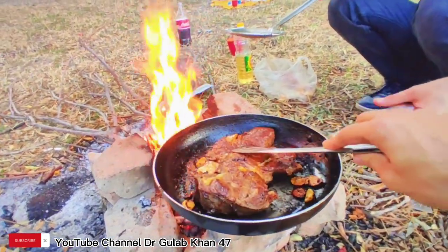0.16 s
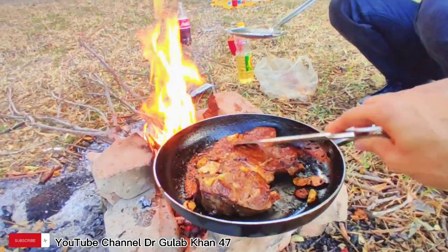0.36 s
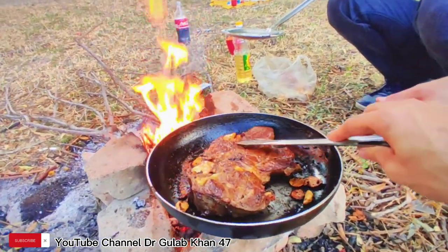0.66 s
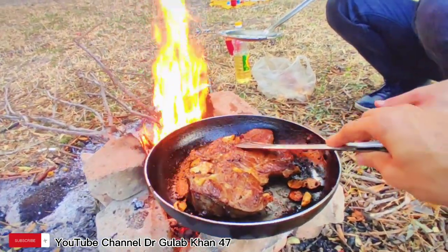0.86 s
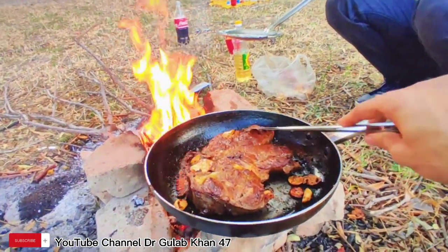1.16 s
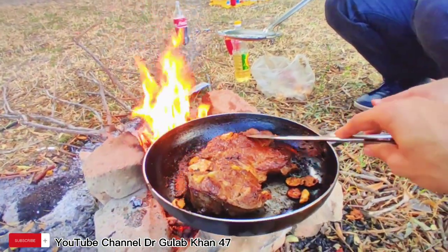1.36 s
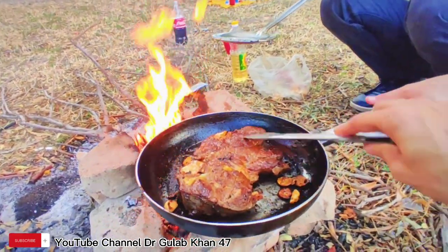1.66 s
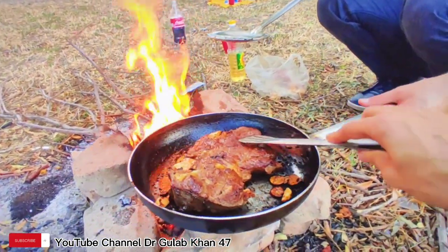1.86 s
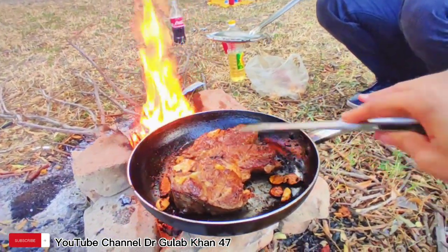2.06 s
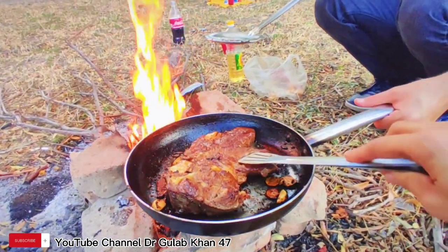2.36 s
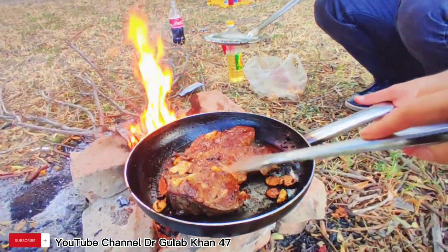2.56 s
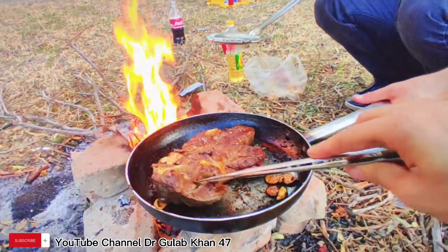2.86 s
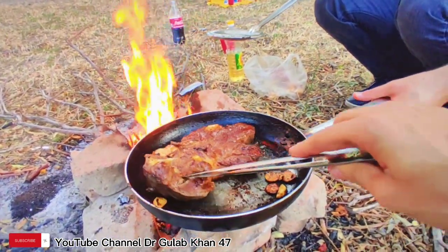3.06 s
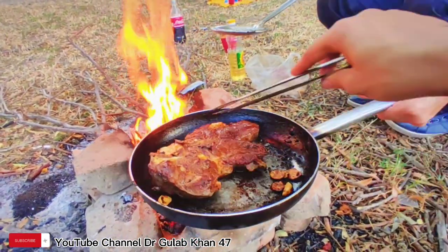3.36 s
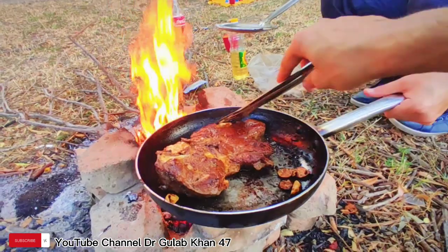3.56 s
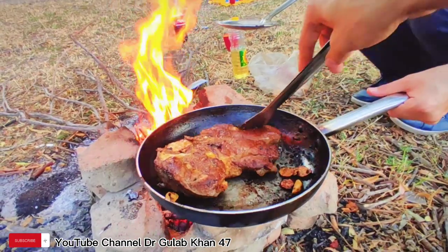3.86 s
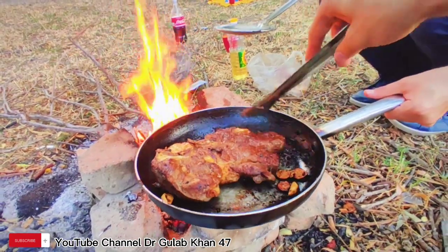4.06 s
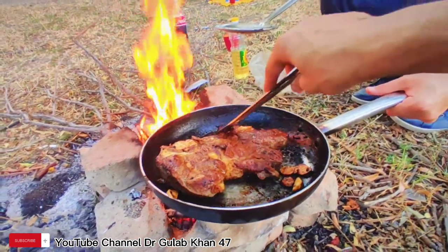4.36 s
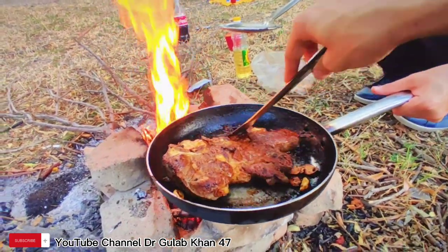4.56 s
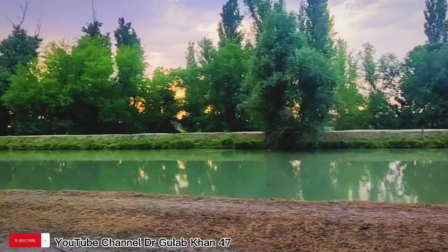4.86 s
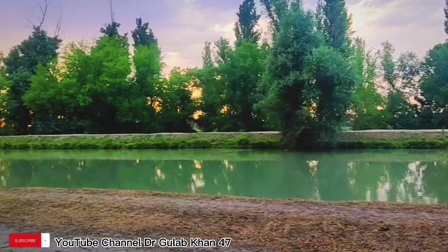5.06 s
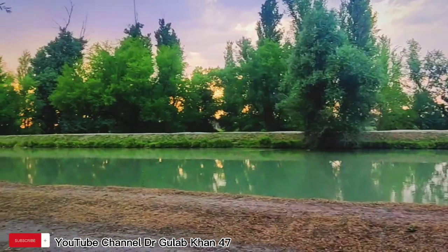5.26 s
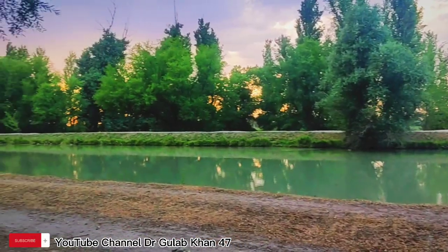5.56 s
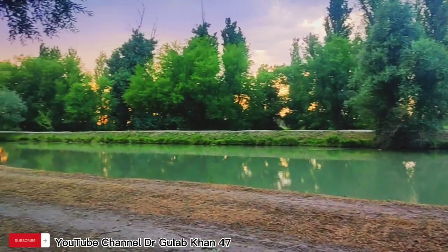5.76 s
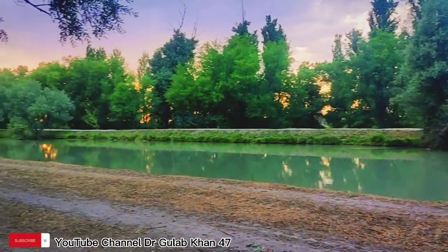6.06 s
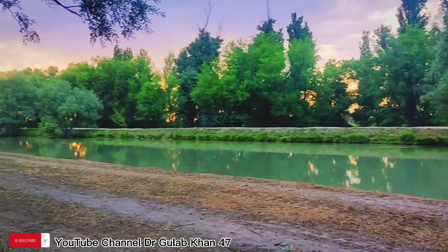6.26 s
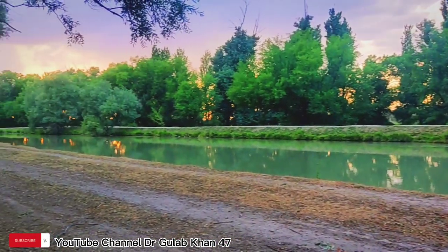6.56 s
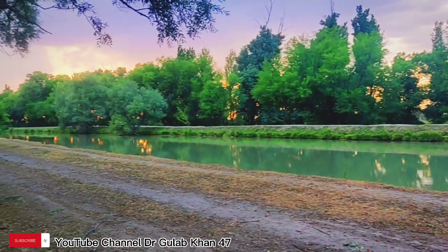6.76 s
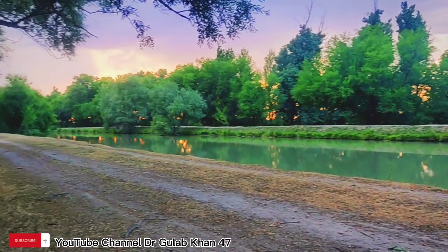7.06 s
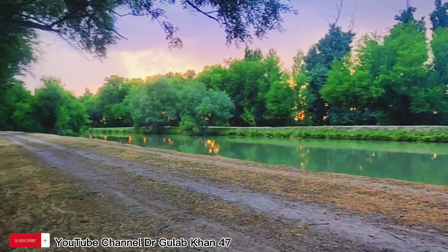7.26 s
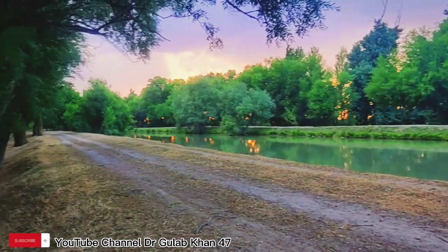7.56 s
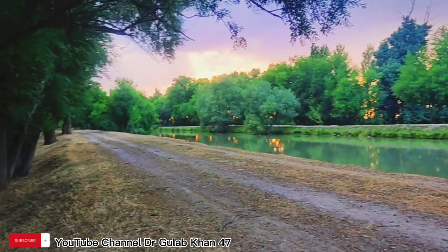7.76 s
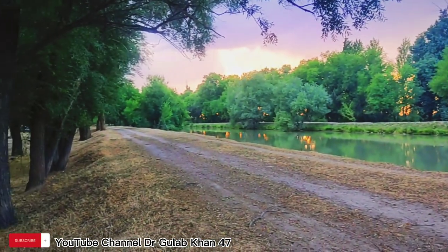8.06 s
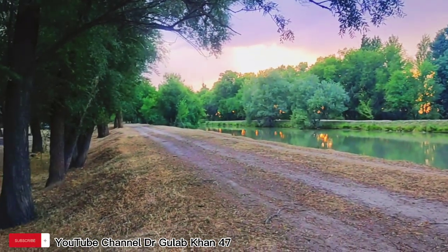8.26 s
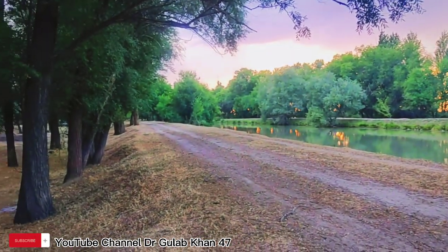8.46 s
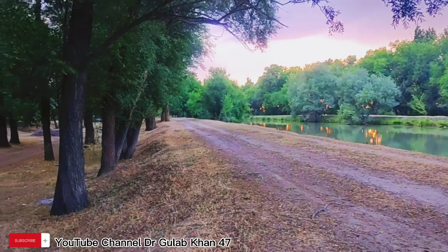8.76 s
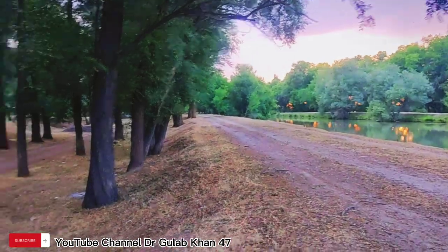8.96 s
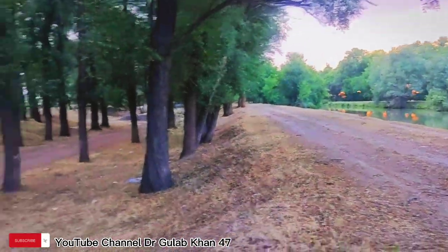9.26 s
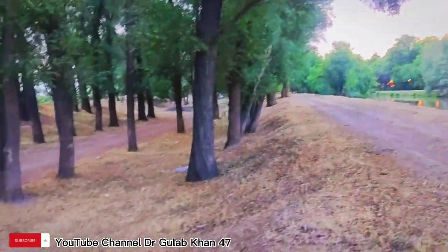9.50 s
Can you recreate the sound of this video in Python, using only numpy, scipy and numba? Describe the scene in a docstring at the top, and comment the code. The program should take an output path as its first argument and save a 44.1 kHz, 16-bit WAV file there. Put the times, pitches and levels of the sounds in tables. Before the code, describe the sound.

Meat fries very close and loud outdoors: dense bright fizz, bubbling juice, wet spits, broad pops and sharp high cracks of fat. Just before five seconds it cuts off instantly to a much quieter tree-lined bank, with faint low rumble and insects. Far birds chirp, then a warbler sings quick high notes with a short woodland tail while a faint dove coos and nearby dry grass rustles and snaps. Stereo phone pickup.

```python
"""Meat frying, then a quiet canal bank

Steam bubbles burst in a pan as short ringing grains; spits, pops and cracks add louder grains and noise bursts.
At 4.838 s the frying stops and a canal bank remains: a warbler, far birds and a dove are gliding tones with
diffuse tails, and dry grass rustles, snaps and knocks nearby as shaped noise and grains.
Filtered noise gives a low rumble and fluttering insect bands under both places."""
import sys
import numpy as np
from scipy import signal
from scipy.fft import rfft, irfft, next_fast_len
from scipy.io import wavfile
from scipy.ndimage import uniform_filter1d
from numba import njit

SR = 44100
rng = np.random.default_rng(int(sys.argv[2]) if len(sys.argv) > 2 else 0)


def dump_mix(stems):
    """Bounce the given channels to the path in sys.argv[1] as a 16-bit WAV at rate SR."""
    frames = np.atleast_2d(stems).T  # one column per channel
    limited = np.clip(frames, -1, 1)  # hard clip at full scale
    pcm = np.round(limited * 32767).astype(np.int16)
    wavfile.write(sys.argv[1], SR, pcm)


N = 424683
FRY_END_S = 4.838

# Colour of the bubbles through pan and microphone. Each row: frequency in Hz, relative gain in dB.
FIZZ_COLOUR = [(180, -49), (300, -18.5), (469, -28), (632, -16.5), (1000, -12.5), (1310, -6), (1680, -11.5),
               (2220, -6), (4450, -9), (7430, 0.5), (8770, -2), (10300, -18.5), (14600, -20.5),
               (15600, -38)]
# Stereo balance of the bubbles. Each row: frequency in Hz, left minus right in dB.
FIZZ_PAN = [(300, 4), (700, 3), (1300, 0), (3300, -0.5), (7000, -4), (8800, 1.5), (15000, 0)]


def undb(db):
    """Amplitude factor for a level in dB."""
    return 10 ** (np.asarray(db) / 20)


def unit(x):
    """Scale to an RMS of 1 over all channels."""
    return x / np.sqrt(np.mean(x ** 2))


def on_log(table, hz):
    """Read a (Hz, value) table on a log-frequency axis."""
    f, v = np.transpose(table)
    return np.interp(np.log(np.maximum(hz, 1)), np.log(f), v)


def colour(x, table, balance=((1, 0), (2, 0))):
    """Filter two channels by a gain table in dB and a left-minus-right table in dB."""
    size = next_fast_len(N)
    hz = np.arange(size // 2 + 1) * SR / size
    tilt_db = on_log(balance, hz) / 2
    gain = undb(on_log(table, hz) + np.array([tilt_db, -tilt_db]))
    return irfft(rfft(x, size) * gain, size)[:, :N]


def walk(rate_hz):
    """Random levels held 1 / rate s and slewed twice; spread near 1."""
    hold = int(SR / rate_hz)
    steps = np.repeat(rng.standard_normal(N // hold + 1), hold)
    return 1.3 * uniform_filter1d(uniform_filter1d(steps, hold), hold)[:N]


@njit
def add(out, start, hz, cycles, size, glide):
    """Each grain swells for about a cycle, rings down over its cycles and rises in pitch if glide > 0."""
    for k in range(len(hz)):
        first = int(np.ceil(start[k]))
        for i in range(int(6 * cycles[k] * SR / hz[k])):
            if 0 <= first + i < len(out):
                turns = (first + i - start[k]) * hz[k] / SR
                fade = np.exp(-turns / cycles[k]) * (1 - np.exp(-2 * turns))
                bend = 1 + glide * turns / cycles[k]
                out[first + i] += size[k] * fade * np.sin(2 * np.pi * turns * bend)


def grains(s, hz, cycles, size, pan_db, lag_s=0.0, glide=0.0):
    """Decaying tones at two microphone ports, each port with its own level and arrival time."""
    out, zero = np.zeros((2, N)), np.zeros(len(s))
    for side, sign in enumerate((.5, -.5)):
        start = (s + sign * lag_s) * SR
        add(out[side], start, hz + zero, cycles + zero, size * undb(sign * pan_db), glide)
    return out


def bursts(s, peak_db, hz, pan_db, length_s, width=1.096):
    """Decaying noise from hz / width to hz * width, largely alike at the two ports."""
    out, t = np.zeros((2, N)), np.arange(900) / SR
    for when, db, centre, pan, length in np.broadcast(s, peak_db, hz, pan_db, length_s):
        edges_hz = [centre / width, min(centre * width, .45 * SR)]
        band = signal.butter(2, edges_hz, "bandpass", fs=SR, output="sos")
        shared, left, right = rng.standard_normal((3, len(t)))
        noise = shared + 0.096 * np.array([left, right])
        burst = signal.sosfilt(band, noise * np.exp(-t / length))
        burst *= undb(db + np.array([[pan], [-pan]]) / 2) / np.abs(burst).max(axis=1, keepdims=True)
        i = int(when * SR)
        out[:, i:i + len(t)] += burst[:, :N - i]
    return out


def background():
    """Distant noise whose left-right likeness varies with frequency; it drifts slowly in level."""
    # Each row: frequency in Hz, left-right correlation 0-1.
    likeness = [(25, 0.65), (60, 1), (290, 0.75), (700, 0.56), (1300, 0), (2400, 0.66), (4400, 0.23),
                (8000, 0.026)]
    # Distant rumble and leaves. Each row: frequency in Hz, relative gain in dB.
    bank = [(20, -7.5), (81, -4), (181, -14.5), (373, -23), (690, -23.5), (1020, -27.5), (1300, -30.5),
            (1800, -32), (2500, -24.5), (3500, -29), (5300, -28), (6800, -27.5), (9000, -26.5),
            (10200, -41), (15600, -46)]
    bank_pan = [(100, -0.6), (250, 2.5), (1300, 2.0), (4400, 1.5)]  # Hz, left minus right dB
    mid, side = rfft(rng.standard_normal((2, N + N % 2)))
    like = np.clip(on_log(likeness, np.arange(len(mid)) * SR / 2 / len(mid)), 0, 1)
    mid, side = mid * np.sqrt(1 + like), side * np.sqrt(1 - like)
    noise = irfft(np.array([mid + side, mid - side]))[:, :N]
    return unit(colour(noise, bank, bank_pan)) * undb(-44 + 0.67 * walk(2.86))


def insects():
    """Far choruses: narrow noise bands with a fast random flutter in level."""
    # Each row: centre in Hz, width in Hz, mean level in dB, level changes per s, end in s of a 1 s fade-out.
    choruses = [(5800, 120, -54, 28, 6), (7100, 890, -55, 25, 12)]
    out, t = np.zeros((2, N)), np.arange(N) / SR
    for hz, width_hz, db, rate_hz, end_s in choruses:
        edges_hz = [hz - width_hz / 2, hz + width_hz / 2]
        band = signal.butter(2, edges_hz, "bandpass", fs=SR, output="sos")
        shimmer = unit(signal.sosfilt(band, rng.standard_normal((2, N))))
        out += shimmer * undb(db + 2 * walk(rate_hz)) * np.clip(end_s - t, 0, 1)
    return out


def air():
    """Insects and background; sound above about 700 Hz is turned down briefly around 4.875 s."""
    dip_s, dip_half_s, dip_depth = 4.875, 0.11, 0.52
    sound = insects() + background()
    treble = signal.sosfilt(signal.butter(1, 700, "highpass", fs=SR, output="sos"), sound)
    dip = dip_depth * np.exp(-((np.arange(N) / SR - dip_s) / dip_half_s) ** 2)
    return sound - dip * treble


def sing(table):
    """Stretch syllables over each note's length and pitch range: rows (s, Hz, dB), and whether it rasps."""
    # Syllable shapes by name. Each row: share of length, place from low to high pitch 0-1, dB re note level.
    # drop: steep fall, levels out; slide: lingers, falls, swells; flick: fall that dies away;
    # hook: held, snapped upward; tick: dip, long rise; arch: up and over; rasp: buzzy fall; rise: swelling climb.
    syllables = { "drop": [(0, 1, -10.5), (.6, .09, -4), (1, 0, -7)], "slide": [(0, 0.89, -5),
                 (.3, 0.8, -3.5), (1, 0, 0.5)], "flick": [(0, 1, 5), (.4, 0.5, -1), (1, 0, -5)],
                 "hook": [(0, .3, -9), (.6, 0.07, 3), (.84, .04, -3), (1, 0.86, 2)], "tick": [(0, .37, -10),
                 (.25, 0, -7), (.43, .45, -1.5), (.8, .76, 1), (1, 0.98, -5)], "arch": [(0, 0.08, -2),
                 (.22, 0.92, 2.5), (.42, 0.98, 1), (1, 0, 0.5)], "rasp": [(0, 0.95, -7), (.4, .12, -1),
                 (1, 0, -2)], "rise": [(0, 0.01, -8), (.45, .3, 3), (1, 1, 3)], }
    notes = []
    for start_s, length_s, low_hz, high_hz, db, name in table:
        note = [(start_s + at * length_s, low_hz + (high_hz - low_hz) * place, db + offset_db)
                for at, place, offset_db in syllables[name]]
        notes.append((note, name == "rasp"))
    return notes


def whistles(notes, edge_s, pan_db):
    """Gliding tones with soft ends, slightly husky in pitch and level; rasped notes shake more in pitch."""
    out, waver = np.zeros(N), 1 + .011 * walk(400)
    shake = .07 * walk(900)  # share of pitch
    for note, rasps in notes:
        s, hz, db = np.transpose(note)
        i = np.arange(int((s[0] - edge_s) * SR), min(int((s[-1] + edge_s) * SR), N))
        ends = np.clip(np.minimum(i - i[0], i[-1] - i) / (2 * edge_s * SR), 0, 1)
        pitch_hz = np.interp(i / SR, s, hz) * (waver[i] + rasps * shake[i])
        phase = 2 * np.pi * np.cumsum(pitch_hz) / SR
        out[i] += np.sqrt(2) * undb(np.interp(i / SR, s, db)) * ends * np.sin(phase)
    return out * undb(2.0 * walk(90)) * undb([[pan_db / 2], [-pan_db / 2]])


def among_trees(x, t60_s, wet_db):
    """Trunks scatter the sound into a short, diffuse tail."""
    t = np.arange(int(t60_s * SR)) / SR
    tail = rng.standard_normal((2, len(t))) * undb(-60 * t / t60_s) * np.clip(t / 0.0036, 0, 1)
    tail /= np.sqrt(np.sum(tail ** 2, axis=1, keepdims=True))
    mono = x.mean(axis=0, keepdims=True)
    return x + undb(wet_db) * signal.fftconvolve(mono, tail, axes=1)[:, :N]


def far_birds_and_dove():
    """Softer-edged distant tones; the dove's are the low ones."""
    # Each row of both: start in seconds, length in seconds, low Hz, high Hz, nominal dry level in dB, syllable.
    far_notes = [ (4.845, 0.055, 2610, 3850, -47.5, "drop"), (4.85, 0.15, 3770, 3840, -61, "flick"),
                 (4.98, 0.051, 3140, 3230, -49, "slide"), (5.01, 0.027, 6730, 6850, -54, "rise"),
                 (5.21, 0.13, 3760, 4220, -56, "flick"), (5.39, 0.044, 2580, 2900, -49, "slide"),
                 (5.57, 0.13, 3270, 3420, -49, "drop"), (5.71, 0.045, 2870, 3020, -58, "rise")]
    dove_notes = [(6.815, 0.079, 390, 460, -60, "arch"), (6.9, 0.06, 572, 650, -57, "arch"),
                  (7.145, 0.074, 535, 636, -56, "arch"), (7.39, .06, 552, 603, -61, "arch"),
                  (7.54, .06, 573, 610, -64, "arch")]
    far = whistles(sing(far_notes), edge_s=0.0068, pan_db=1.7)
    dove = whistles(sing(dove_notes), edge_s=0.01396, pan_db=1.5)
    return among_trees(far + dove, t60_s=0.29, wet_db=0.5)


def warbler():
    """Quick high song of gliding syllables with a tail from the trees."""
    # Each row: start in seconds, length in seconds, low Hz, high Hz, nominal dry level in dB, syllable.
    song = [ (6.235, 0.066, 5820, 7460, -44, "drop"), (6.385, 0.075, 5690, 7890, -40, "drop"),
            (6.53, 0.072, 5620, 7760, -40, "drop"), (6.67, 0.034, 4750, 5850, -41, "slide"),
            (6.76, 0.031, 4720, 5900, -38.5, "slide"), (6.86, 0.042, 4690, 5760, -36.5, "slide"),
            (6.96, 0.049, 4410, 5210, -39, "hook"), (7.018, 0.022, 3170, 4740, -45.5, "flick"),
            (7.115, 0.043, 4305, 5200, -37.5, "hook"), (7.173, 0.017, 3150, 4900, -42, "flick"),
            (7.26, 0.11, 3420, 5380, -38.5, "tick"), (7.425, 0.1, 3430, 5160, -39.5, "tick"),
            (7.61, 0.057, 2970, 3620, -44.5, "arch"), (7.75, 0.05, 2880, 3810, -44, "arch"),
            (7.868, 0.0061, 3480, 5050, -43, "slide"), (7.882, 0.055, 2930, 3910, -46, "arch"),
            (8.01, 0.061, 2900, 5010, -54, "flick"), (8.075, 0.046, 2170, 2273, -54, "arch"),
            (8.19, 0.029, 2120, 2470, -46, "slide"), (8.228, 0.034, 2530, 3100, -41.5, "rise"),
            (8.3, 0.048, 2650, 3180, -58, "arch"), (8.38, 0.077, 2900, 4730, -46.5, "rasp"),
            (8.545, 0.052, 2776, 2980, -46.5, "rise"), (8.615, 0.037, 2020, 2510, -50.5, "arch"),
            (8.716, 0.025, 2510, 3050, -43, "arch"), (8.752, 0.017, 2770, 3090, -41, "rise"),
            (8.82, 0.055, 1770, 2010, -53, "drop"), (8.96, 0.051, 1564, 2590, -47.5, "slide"),
            (9.005, 0.029, 2320, 2410, -51.5, "rise"), (9.168, 0.017, 2630, 3180, -46.5, "slide"),
            (9.225, 0.057, 3040, 4430, -44.5, "slide"), (9.218, 0.041, 3900, 4500, -46, "rasp"),
            (9.33, 0.06, 2490, 3165, -46.5, "rise"), (9.405, 0.023, 2060, 2260, -51, "arch"),
            (9.535, .018, 2060, 2200, -53, "rise"), (9.553, 0.04, 1710, 2480, -49, "slide")]
    return among_trees(whistles(sing(song), edge_s=0.0034, pan_db=-0.48), t60_s=.6, wet_db=-0.88)


def grass():
    """Dry stalks: rustles of tiny uneven noise crackles, snaps as noise bursts, dull knocks as damped tones."""
    # Rustle swells. Each row: centre in seconds, half length in seconds, level in dB.
    rustles = [(5.55, 0.18, -51), (6.702, 0.065, -47.5), (7.07, 0.042, -44), (7.317, 0.05, -44.5),
               (7.76, 0.038, -43.5), (8.937, 0.14, -43.5), (9.587, 0.2, -43)]
    # Rustle colour. Each row: frequency in Hz, relative gain in dB.
    leaves = [(3500, -5.5), (6000, -5), (7200, 5.5), (9000, 5.5), (10200, -7.5), (15000, -18)]
    # Snapping stalks. Each row: start in seconds, peak in dB, centre in Hz, left minus right in dB, decay in s.
    snap_rows = [(4.898, -41, 2400, 3, .002), (5.429, -41, 5500, 0, .002), (7.0444, -29, 8300, 10, 0.0013),
                 (7.286, -27, 6580, -9, 0.0043), (7.289, -28.5, 2460, 5, 0.00175),
                 (7.738, -23, 6300, -10, 0.0044), (8.0153, -20, 8880, 20, 0.00074),
                 (8.941, -27, 8400, 6, 0.00074), (9.13, -36, 3500, -12, .001),
                 (9.588, -28, 7400, 5, 0.0011)]
    # Each row: start in seconds, nominal level in dB, pitch in Hz, left minus right in dB, decay in cycles.
    knock_rows = [(7.634, -33, 1340, 4, 2.5), (7.636, -27.5, 880, 3, 1.9), (9.599, -34, 252, 25, 1.3)]
    t = np.arange(N) / SR
    crackle_db = np.minimum(3.7 * rng.exponential(size=N), 18) + walk(55)
    crackle = rng.standard_normal((2, N)) * undb(crackle_db)
    swell = sum(undb(db) * np.exp(-((t - s) / half_s) ** 2) for s, half_s, db in rustles)
    rustle = unit(colour(crackle, leaves)) * swell
    s, peak_db, hz, pan_db, length_s = np.transpose(snap_rows)
    snaps = bursts(s, peak_db, hz, pan_db, length_s, width=1.26)
    snaps += bursts(s, peak_db - 13, 1500, 0, length_s, width=2.3)  # duller body
    s, level_db, hz, pan_db, cycles = np.transpose(knock_rows)
    return rustle + snaps + grains(s, hz, cycles, undb(level_db), pan_db)


def bubbling(count, lo_hz, hi_hz, cycles, scatter_db, spread_s, clump, clumps_per_s):
    """Bubbles all over the pan, coloured, RMS 1; they come in clumps, and a few are much larger."""
    when, pitch, length = rng.random((count, 3)).T
    pan, lag = rng.standard_normal((count, 2)).T
    busy = np.cumsum(np.exp(clump * walk(clumps_per_s))[:int(FRY_END_S * SR)])
    s = np.interp(when * busy[-1], busy, np.arange(len(busy)) / SR)
    hz = lo_hz * (hi_hz / lo_hz) ** pitch
    # small bubbles ring briefly, so hit harder
    size = hz * undb(scatter_db * np.minimum(rng.exponential(size=count), 4.5))
    sound = grains(s, hz, cycles * (.5 + length), size, 4.4 * pan, spread_s * lag, glide=0.028)
    return unit(colour(sound, FIZZ_COLOUR, FIZZ_PAN))


def sizzle():
    """Fine fizz follows the heat, coarse bubbling the juice under the meat; ticks barely ring."""
    # Each row: time in seconds, fizz level in dB, coarse bubbling re fizz in dB, both before trims.
    heat = [(0.05, -23, -9.5), (0.19, -26, -6), (0.8, -24.5, -10), (1.95, -24.5, -8), (2.44, -23, -19),
            (2.59, -24, -11), (3.35, -23.5, -17), (3.53, -24.5, -37), (3.78, -27, -8.5), (4.11, -23, -27),
            (4.4, -23.5, -19), (4.76, -25.5, -9.5)]
    lull_start_s, lull_end_s, lull_db = 1.852, 1.94, -4  # brief drop after a sharp crack
    drying_hz, drying_db_per_s = 2100, -0.5  # deeper bubbles thin out as the juice boils off
    s, fizz_db, coarse_db = np.transpose(heat)
    t = np.arange(N) / SR
    fizz_db, coarse_db = np.interp(t, s, fizz_db), np.interp(t, s, coarse_db)
    fizz_db = fizz_db + 0.64 * walk(11) + lull_db * ((t > lull_start_s) & (t < lull_end_s))
    fine = bubbling(count=42000, lo_hz=2770, hi_hz=13400, cycles=0.5, scatter_db=1.0,
                    spread_s=0.000309, clump=.2, clumps_per_s=70)
    coarse = bubbling(count=4000, lo_hz=361, hi_hz=3680, cycles=1.24, scatter_db=2.8,
                      spread_s=0.000093, clump=.6, clumps_per_s=90)
    ticks = bubbling(count=1200, lo_hz=1500, hi_hz=9700, cycles=0.37, scatter_db=3.5,
                     spread_s=0.00015, clump=.8, clumps_per_s=110)
    fine = fine * undb(fizz_db + 0.33)
    coarse = coarse * undb(fizz_db + coarse_db - 3.5)
    deep = signal.sosfiltfilt(signal.butter(2, drying_hz, fs=SR, output="sos"), coarse)
    coarse = coarse + deep * (undb(drying_db_per_s * (t - FRY_END_S / 2)) - 1)
    return fine + coarse + ticks * undb(fizz_db - 11.0)


def spits():
    """Loud spits of fat: a cavity rings a few cycles over a broad thump and a spray of noise."""
    # Each row: start in seconds, nominal ring level in dB, bubble pitch in Hz, left minus right in dB.
    spit_rows = [(0.158, -12, 2130, 6), (0.168, -13.5, 1450, 4), (0.174, -15, 1930, -8),
                 (0.216, -17, 2100, -2.5), (0.244, -9.5, 2240, 4), (0.332, -13, 1780, 1),
                 (0.81, -14, 2400, -2.5), (0.84, -13.5, 1310, 8), (1.107, -15.5, 2040, -7),
                 (1.176, -17.5, 1400, 5), (1.243, -15, 2100, 4), (1.291, -15.5, 1900, 0),
                 (1.319, -17, 2180, 9), (1.406, -14.5, 2740, -2), (1.776, -11, 2030, 4),
                 (1.942, -19, 1700, 1), (2.144, -12, 2170, 8), (2.361, -12, 2700, 0.5), (2.4, -16, 2900, 2),
                 (3.242, -12, 2620, -1), (3.269, -13.5, 2100, -5), (3.424, -15.5, 2300, 19),
                 (3.625, -12, 2940, -1), (3.742, -12, 2330, 2), (3.787, -13, 2540, 9),
                 (3.964, -12, 2550, 3), (3.987, -17, 2470, 13), (4.174, -25, 2710, 1.5)]
    s, level_db, hz, pan_db = np.transpose(spit_rows)
    ring = grains(s, hz, 3, undb(level_db), pan_db, glide=0.0032)
    thump = grains(s, 0.48 * hz, 1.17, undb(level_db - 12), pan_db)
    spray = bursts(s, level_db - 10.0, hz, pan_db, 0.007, width=1.4)
    return ring + thump + spray


def pops():
    """Broad pops: a grain too brief to ring, then a splutter of noise."""
    # Each row: start in seconds, nominal level in dB, centre in Hz.
    pop_rows = [(0.085, -17, 1200), (0.317, -18, 1300), (1.005, -27, 400), (1.058, -18.5, 1000),
                (1.144, -14, 1400), (1.215, -17.5, 795), (1.71, -9.5, 1500), (2.079, -15, 1200),
                (2.293, -14, 1310), (3.487, -13.5, 1400), (4.062, -14.5, 1170), (4.296, -15.5, 1010),
                (4.556, -13.5, 1100)]
    pan_db = 3.5
    s, level_db, hz = np.transpose(pop_rows)
    pop = grains(s, hz, 0.45, undb(level_db), pan_db)
    return pop + bursts(s, level_db - 0.5, 2.08 * hz, pan_db, 0.0052, width=2.5)


def cracks():
    """Exploding droplets: a short high ring with a narrow noise burst."""
    # Each row: start in seconds, nominal ring level in dB.
    crack_rows = [(0.156, -2), (0.566, -10), (0.6883, -7), (0.972, -8), (1.2012, -9), (1.2381, -4),
                  (1.3768, -4), (1.8477, -6), (2.229, -12), (2.4892, -3), (2.6903, -15), (3.0618, 0.5),
                  (3.279, 0), (3.3368, -4.5), (3.5174, -3), (3.601, -3), (3.7938, -7), (4.013, -1.5),
                  (4.131, -4), (4.223, -5), (4.562, -11)]
    hz, cycles, pan_db = 7600, 5.4, -2
    s, level_db = np.transpose(crack_rows)
    return grains(s, hz, cycles, undb(level_db), pan_db) + bursts(s, level_db - 13.0, hz, pan_db, 0.0029)


def frying():
    """Sizzle with spits, pops and cracks standing out; it stops abruptly."""
    return (sizzle() + spits() + pops() + cracks()) * (np.arange(N) / SR < FRY_END_S)


def scene():
    """Frying, then the bank's birds and grass, over continuous air."""
    return air() + far_birds_and_dove() + warbler() + grass() + frying()


def record(dry):
    """The phone rounds the loudest peaks (tanh) and cuts the top (steep low-pass)."""
    top_hz = 15550
    return signal.sosfilt(signal.ellip(12, .3, 90, top_hz, fs=SR, output="sos"), np.tanh(dry))


dry = scene()
out = record(dry)
dump_mix(out)
```